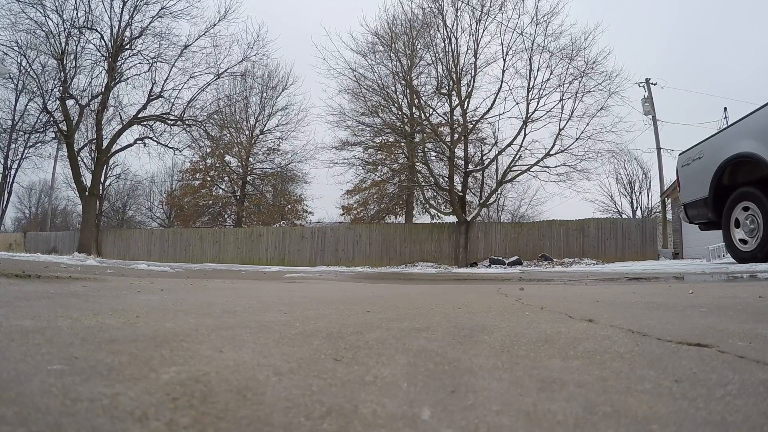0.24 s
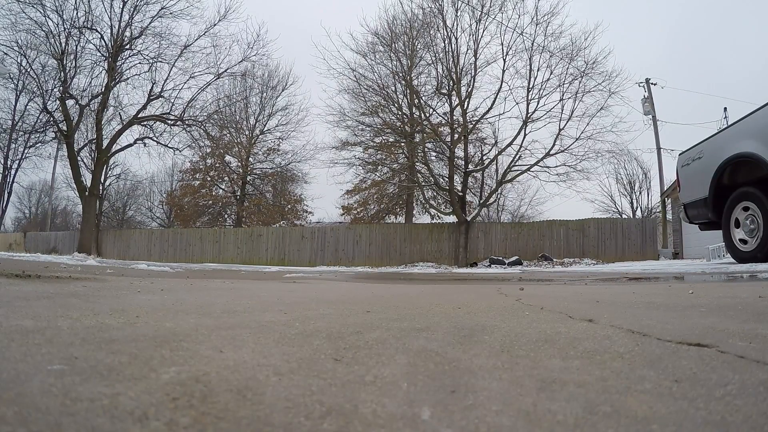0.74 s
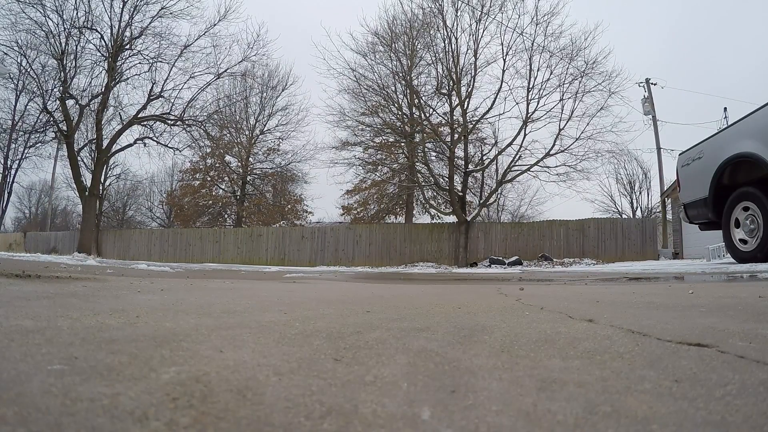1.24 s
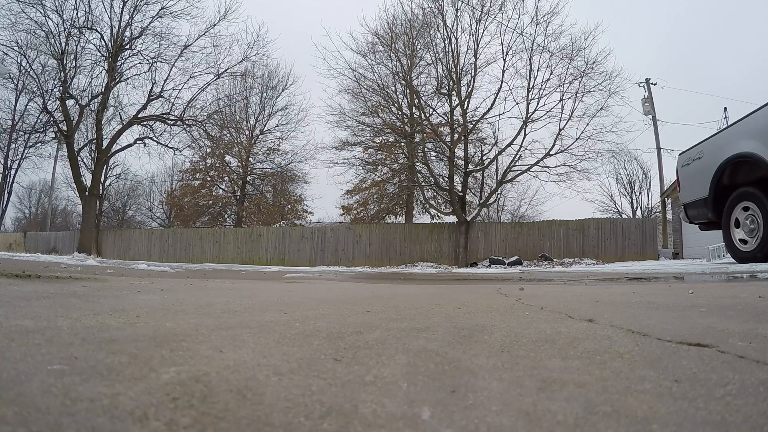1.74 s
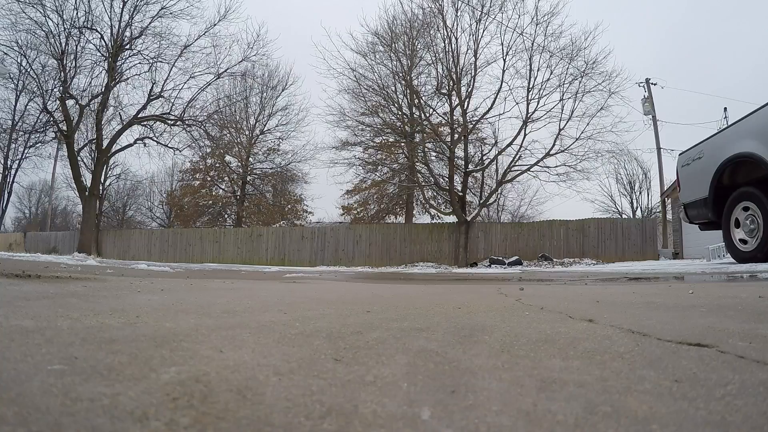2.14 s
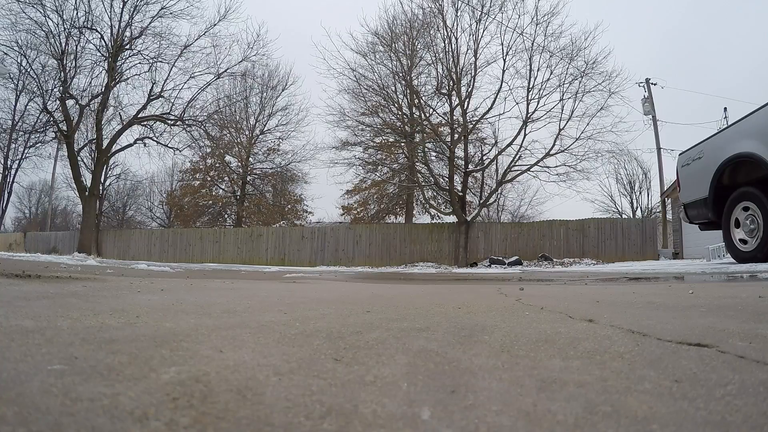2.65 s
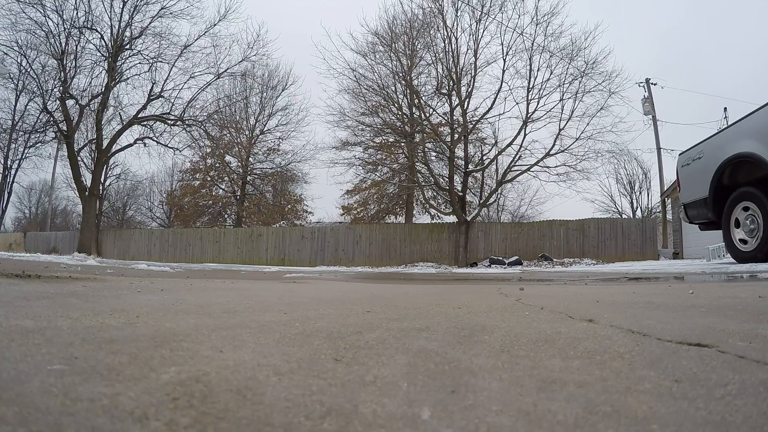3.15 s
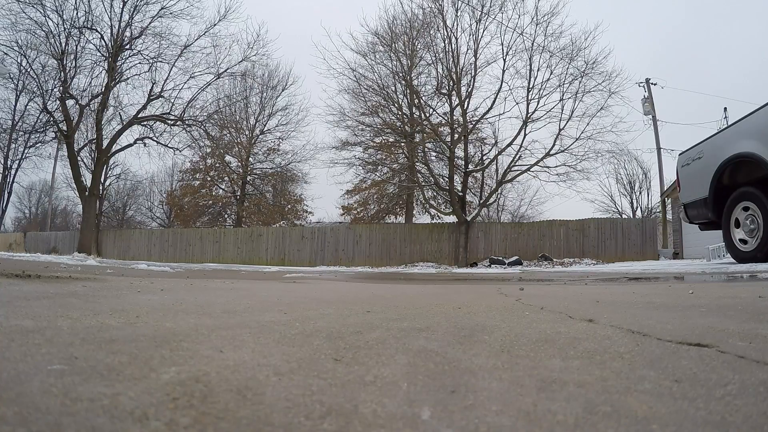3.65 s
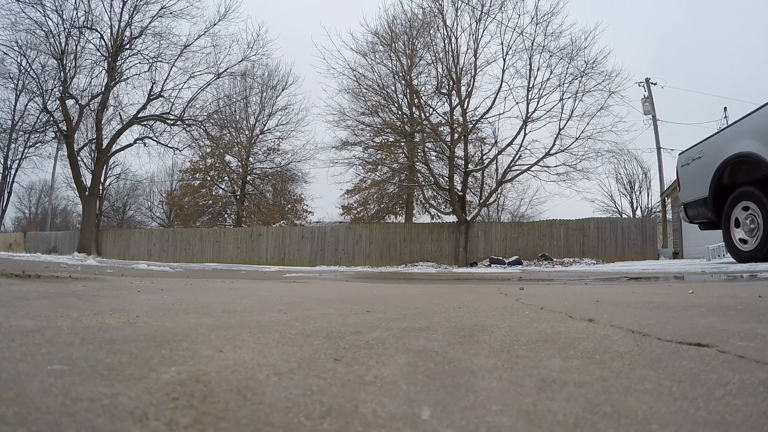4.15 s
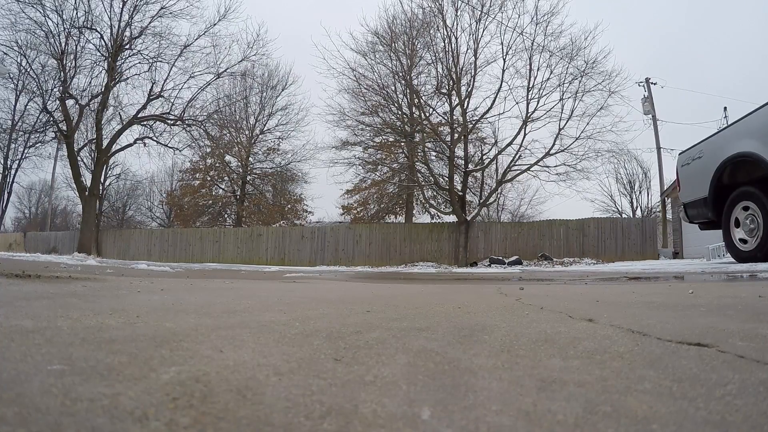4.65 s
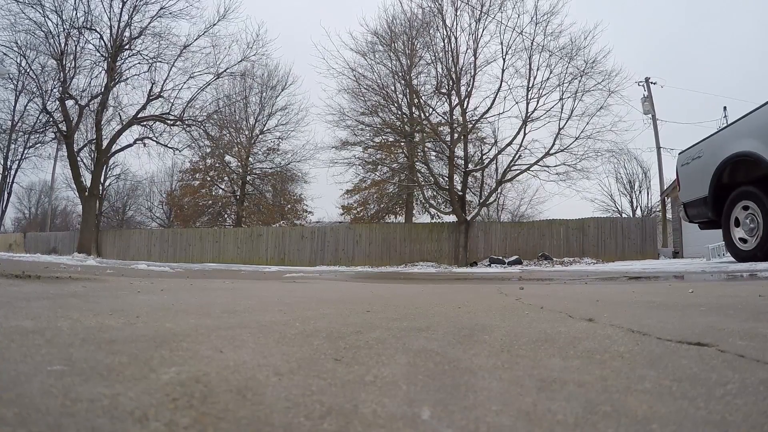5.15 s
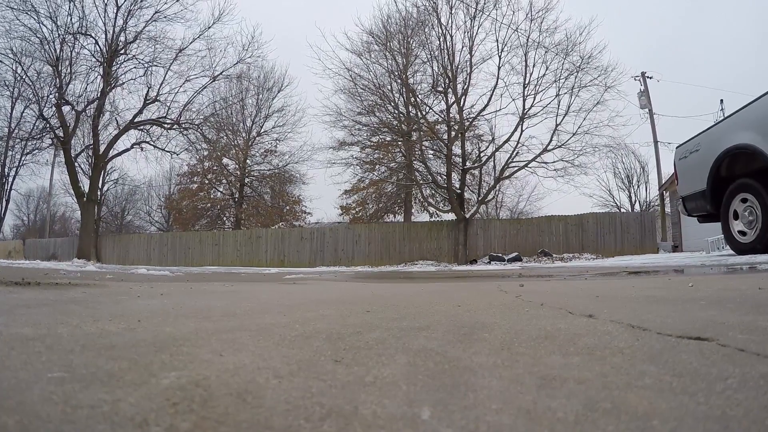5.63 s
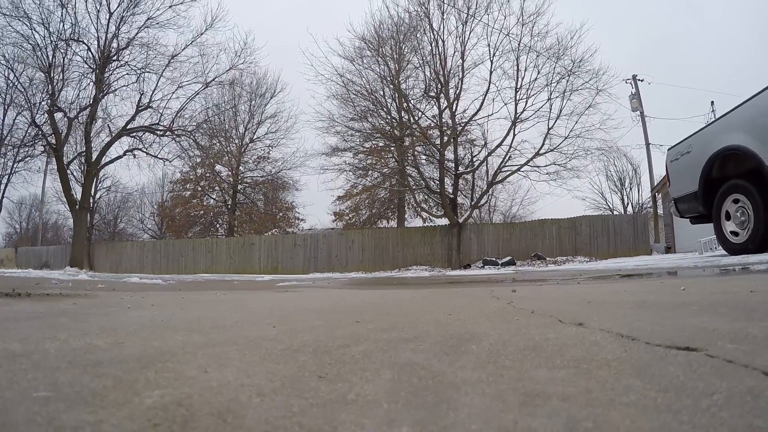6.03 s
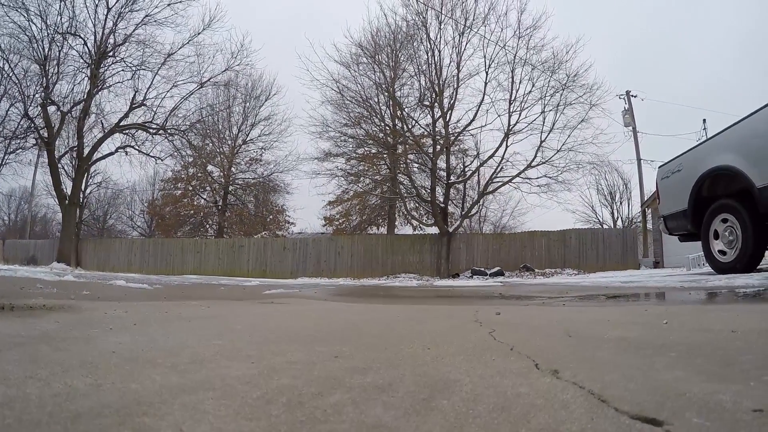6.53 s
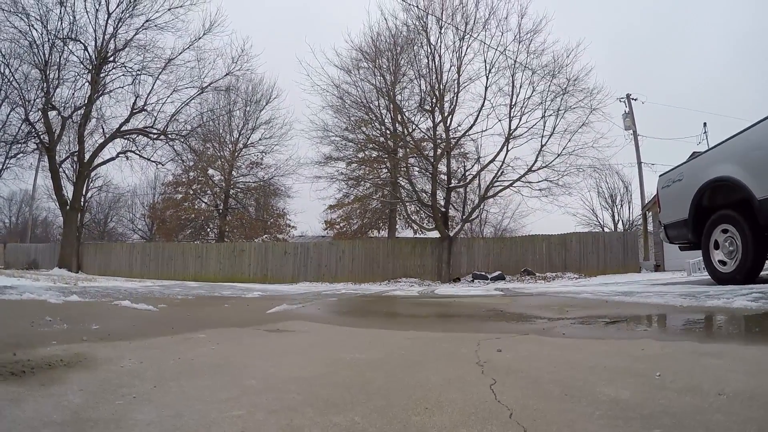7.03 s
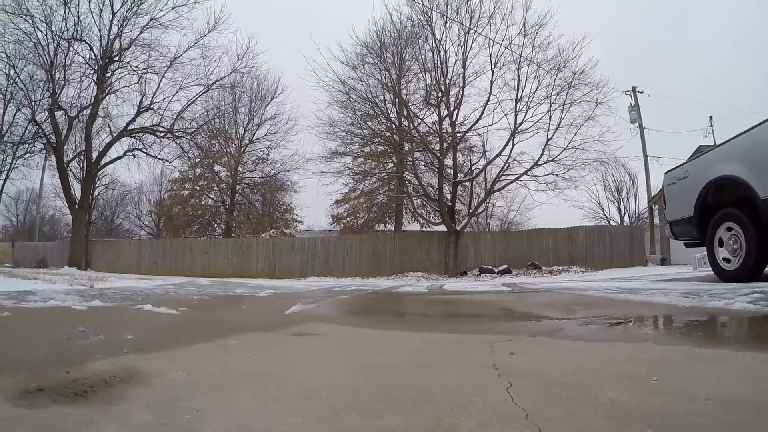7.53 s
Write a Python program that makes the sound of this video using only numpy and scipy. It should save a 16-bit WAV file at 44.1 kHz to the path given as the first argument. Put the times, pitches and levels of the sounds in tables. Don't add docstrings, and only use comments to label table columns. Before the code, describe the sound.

In a quiet yard a switch clicks, then small drone motors surge into a rough, buzzing whine that climbs as the craft lifts off.

```python
import sys
import numpy as np
from scipy import signal
from scipy.fft import rfft, irfft
from scipy.io import wavfile
from scipy.ndimage import uniform_filter1d

SR = 44100
rng = np.random.default_rng(int(sys.argv[2]) if len(sys.argv) > 2 else 0)


def inscribe(sig):
    pcm = np.round(np.clip(np.atleast_2d(sig).T, -1, 1) * 32767)
    wavfile.write(sys.argv[1], SR, pcm.astype(np.int16))


def how_loud(loudness_db):
    steps = np.asarray(loudness_db, float) / 20
    return 10 ** steps


N = 343317
START_S = 3.5845

# time_s, first_hz, second_hz, third_hz
ASKED_RATES = [(4.0, 213, 212, 213), (4.75, 217.5, 214.5, 215.5), (5.2, 222, 219, 221),
               (5.35, 231, 225, 229), (5.5, 248, 232, 238), (5.8, 266, 247, 251), (5.97, 265, 253, 258),
               (6.1, 256, 258, 260), (6.25, 254, 264, 262), (6.55, 262, 268, 277), (6.72, 265, 273, 276),
               (6.85, 272, 277, 279), (7.0, 273, 281, 290), (7.44, 280, 282, 303), (7.56, 287, 289, 310),
               (7.78, 291, 298, 309)]
# time_s, first_db, second_db, third_db
ROTOR_LEVELS = [
    (3.9, -13, -14, -32),
    (4.1, -10, -17, -25),
    (4.6, -13.5, -18, -14),
    (5.2, -11.5, -18, -19),
    (5.8, -12.5, -19, -16),
    (6.3, -19, -16, -12),
    (6.8, -22, -11, -21),
    (7.05, -13.5, -23, -12.5),
    (7.78, -13.5, -24, -12),
]
# kick_hz, gain_hz_per_s, knee_sharpness
SPIN_UP = [(12, 660, 6.5), (10, 580, 3.6), (11, 650, 6)]
# blade_rate_multiple, level_db
BLADE_HARMONICS = [(.5, -20), (1, -1.5), (1.5, -30.5), (2, -13), (2.5, -35), (3, -20), (4, -26.5),
                   (5, -30.5), (6, -34), (7, -35), (8, -34.5)]
SWITCH_RATES = [7561, 7553, 7546]
# switch_multiple, blade_rate_multiple, first_db, second_db, third_db
MOTOR_TONES = [(0, 21, -52, -46, -39.5), (0, 10.5, -46, -52, -54), (1, 0, -38, -32, -40),
               (1, 3.5, -48, -47, -54), (1, 7, -43, -34, -47), (1, -7, -54, -56, -60),
               (1, -10.5, -52, -57, -54), (1, -21, -53, -48, -56), (1, 21, -68, -68, -63),
               (2, 0, -41, -40, -41), (2, -7, -65, -60, -65)]
# time_s, whine_hz
FOURTH_WHINE = [
    (4.3, 4260),
    (5.4, 4200),
    (5.88, 3800),
    (6.14, 4750),
    (6.3, 5020),
    (6.8, 5210),
    (7.0, 5110),
    (7.35, 5080),
    (7.78, 5280),
]
# centre_hz, width_hz, level_db
FRAME_MODES = [(2550, 430, 7), (5250, 600, 7), (8400, 650, 7)]
# centre_hz, width_hz, level_db
LURCH_MODES = [(222, 120, 4), (480, 180, -13), (820, 690, -24.5), (1430, 280, -8.5), (2550, 760, -2),
               (2820, 330, -5.5), (4000, 1400, -13), (5220, 1350, -10), (6500, 2700, -13.5),
               (7460, 490, -8), (8140, 750, 3.5), (10000, 1000, -28), (13500, 1500, -26), (14700, 700, -26)]
# pitch_hz, rms_db
FRAME_HUMS = [(5495, -44.5), (5907, -49), (7348, -51), (7786, -48), (8640, -74)]
# frequency_hz, density_db
BUFFET_SPECTRUM = [(7.1, -34), (12, 5.5), (54, 8), (177, -4.5), (205, -7.5), (232, -8), (273, -9.5),
                   (605, -25), (900, -64), (1170, -105), (1980, -120)]
# frequency_hz, density_db
SWISH_SPECTRUM = [(150, -4), (300, 3.5), (600, -4.5), (1200, -1), (2000, -3), (3000, -15.5), (4500, -9)]
# frequency_hz, density_db
TIP_SPECTRUM = [(1200, -14), (2200, 1), (2900, 2), (3600, -2), (4500, 0), (6000, -1), (7000, -3), (8200, 2),
                (9300, -3), (10200, -9), (11500, -12), (13500, -11), (15000, -9), (15800, -9)]
# centre_s, peak_db, length_s
GUSTS = [
    (3.754, -21, .04),
    (3.85, -38, 0.036),
    (4.006, -27, 0.015),
    (4.49, -19.5, 0.18),
    (5.01, -19, 0.067),
    (5.15, -19.5, 0.058),
    (5.46, -24, 0.12),
    (5.655, -29, 0.1),
    (6.2, -21, 0.37),
    (6.705, -24, .04),
]
# start_s, peak_db, body_db
CLICKS = [
    (1.128, -46, -11),
    (2.1654, -49, 6),
    (2.7826, -15, -12.5),
    (2.7948, -44, 8),
    (2.8185, -42, -1),
    (2.8642, -45, -6),
]
# pitch_hz, level_db, t60_s
HOUSING_MODES = [(530, 2.5, 0.033), (764, 3.5, 0.024)]
# frequency_hz, density_db
SNAP_SPECTRUM = [(900, -10), (1500, -13), (2200, -32), (2600, 0), (3400, -1), (4700, -7), (6000, -18),
                 (13500, -13), (15700, -24)]
# frequency_hz, density_db
YARD_SPECTRUM = [(7.1, -31), (12, -1), (61, -1), (87, -10.5), (336, -25.5), (368, -23), (403, -26.5),
                 (613, -25), (779, -27), (1220, -28.5), (1460, -33), (8610, -46), (15700, -52)]
# pitch_hz, rms_db
MACHINE_HUMS = [(366.1, -72), (436.0, -74.5), (495.3, -72), (554.5, -78), (608.3, -66), (1222, -71),
                (7375, -94), (8500, -81)]


def drone():
    asked = curves(ASKED_RATES)
    smooth = [spin(hz, *law) for hz, law in zip(asked, SPIN_UP)]
    idle_hz, hover_hz = 218, 288
    load = np.clip((np.mean(asked, axis=0) - idle_hz) / (hover_hz - idle_hz), 0, 1)
    inrush = 1 - ramp(START_S, 0.26)
    wobble_hz = 0.35 + (2.6 - 0.35) * np.minimum(load / 0.35, 1)
    speeds = [hz + wobble_hz * hunting() for hz in smooth]
    phases = [turns(hz) for hz in speeds]

    rotors = 0
    for phase, hz, goal, db in zip(phases, smooth, asked, curves(ROTOR_LEVELS)):
        rotors = rotors + blades(phase, hz, thrust(hz, goal, db))

    surge_start_db, surge_full_db, rise_s, hold_s, fall_s = 9, 14.5, 0.11, 0.095, 0.07
    surge_db = surge_start_db + (surge_full_db - surge_start_db) * ramp(START_S, rise_s)
    surge_db = surge_db - surge_full_db * ramp(START_S + rise_s + hold_s, fall_s)
    tones_db = 6 * inrush - load
    octave_db = 5 + 7 * inrush - 9.5 * load
    motors = sum(motor(i, speeds[i], phases[i], surge_db, tones_db, octave_db) for i in range(3))

    lurch_db = -16.5 - 53 * ramp(START_S, 0.4) ** 2.2
    steady_db = -35 - 5 * np.minimum(2 * inrush, 1) - 2 * load
    frame = rattle(lurch_db, steady_db) + frame_hums(load)
    sound = rotors + motors + frame + downwash(phases, load) + fourth_motor()
    return ramp(START_S, 0.002) * sound


def spin(asked_hz, kick_hz, gain_hz, knee):
    climb_hz = kick_hz + gain_hz * np.maximum(np.arange(N) / SR - START_S, 0)
    return (climb_hz ** -knee + asked_hz ** -knee) ** (-1 / knee)


def hunting():
    return np.sin(turns(6.8 + 1.2 * walk(3))) + 0.35 * walk(16)


def thrust(hz, asked_hz, db):
    speed_power = 1.9
    return db + 20 * speed_power * np.log10(hz / asked_hz)


def blades(phase, hz, db):
    stack = 0
    for multiple, order_db in BLADE_HARMONICS:
        gain = how_loud(order_db + 1.25 * walk(14)) * shudder(multiple * hz)
        stack = stack + gain * np.sin(multiple * phase + 6 * rng.random())
    return np.sqrt(2) * how_loud(db) * stack


def shudder(hz):
    mount_hz, width_hz, mount_db = 128, 30, 10.5
    starting = 1 - ramp(START_S + 0.3, 0.1)
    return 1 + starting * how_loud(mount_db) / (1 + (2 * (hz - mount_hz) / width_hz) ** 2) ** 2


def motor(which, hz, phase, surge_db, tones_db, octave_db):
    switch_hz = SWITCH_RATES[which] + 2.5 * walk(5) + 4.5 * walk(60)
    switch = turns(switch_hz)
    out = 0
    for m, k, *db in MOTOR_TONES:
        tone_hz = np.abs(m * switch_hz + k * hz)
        radiates = tone_hz ** 4 / (tone_hz ** 4 + 2200. ** 4)
        passes = 1 - 0.6 / (1 + (2 * (tone_hz - 3450) / 900) ** 2)
        rings = 1 + how_loud(surge_db * (k != 0)) * resonance(tone_hz)
        group_db = octave_db if m > 1 else tones_db
        gain = how_loud(flying_db(m, k, hz) + db[which] + group_db + 2.8 * walk(14))
        out = out + gain * passes * radiates * rings * np.sin(m * switch + k * phase)
    return out


def flying_db(m, k, hz):
    if m == 0:
        from_hz, db_per_hz = (240, -0.1) if k > 20 else (245, 0.17)
    else:
        from_hz, db_per_hz = (218, 0.13) if k > 20 else (218, -0.19)
    return db_per_hz * np.maximum(hz - from_hz, 0) * (k > 0)


def fourth_motor():
    (hz,) = curves(FOURTH_WHINE)
    swell = ramp(5.85, 0.5)
    db = -35.5 - 13 * (1 - swell)
    hz = hz + swell * (75 * hunting() + 20 * walk(60))
    shaft = 1 + 0.4 * swell * (1 + 0.5 * walk(6)) * np.sin(turns(hz / 42))
    whine = shaft * how_loud(2.5 * walk(25)) * np.sin(turns(hz))
    sideband = how_loud(-7 + 5 * walk(5)) * np.sin(turns(SWITCH_RATES[1] + hz / 7))
    strand = swell * how_loud(-5 + 5 * walk(9)) * np.sin(turns(hz + 90 * hunting()))
    blade = np.sin(turns(hz / 21))
    return np.sqrt(2) * ramp(FOURTH_WHINE[0][0], 0.09) * how_loud(db) * (whine + strand + blade + sideband)


def rattle(lurch_db, steady_db):
    hz = np.arange(N // 2 + 1) * SR / N
    steps = rfft(rng.standard_normal(N) * how_loud(0.83 * walk(300)))
    modes = sum(how_loud(db) / (1 + (2 * (hz - f) / width) ** 2) ** 2 for f, width, db in LURCH_MODES)
    lurch = level(irfft(steps * modes, N), 0)
    steady = level(irfft(steps * resonance(hz), N), 0)
    return how_loud(lurch_db) * lurch + how_loud(steady_db) * steady


def resonance(hz):
    return sum(how_loud(db) / (1 + (2 * (hz - f) / width) ** 2) for f, width, db in FRAME_MODES)


def frame_hums(load):
    out = 0
    for hz, db in FRAME_HUMS:
        load_db = (1 - 14 * load) * (hz < 7000)
        out = out + how_loud(db + load_db + 1.3 * walk(5.3)) * np.sin(turns(hz + 7 * walk(27)))
    return out


def downwash(phases, load):
    t = np.arange(N) / SR
    aloft = ramp(6.68, 0.14)
    still = np.exp(-np.maximum(t - START_S - 0.15, 0) / 0.12)
    buffet_db = -22.5 - 38 * (1 - ramp(START_S, 0.25)) - 11 * aloft
    puffs = how_loud(buffet_db) + sum(how_loud(db) * np.exp(-((t - s) / length) ** 2) for s, db, length in GUSTS)
    swish_db = -26.5 - 37 * still + 1.5 * load - 9 * aloft
    tips_db = -43 - 19 * still - 0.5 * aloft
    pulse = 1 + 0.13 * (np.cos(phases[0]) + np.cos(phases[1]))
    buffet = puffs * how_loud(2.5) * noise(BUFFET_SPECTRUM, 0.96, 9.3)
    swish = how_loud(swish_db - 2) * noise(SWISH_SPECTRUM, 1.3, 15)
    tips = how_loud(tips_db + 13) * noise(TIP_SPECTRUM, 0.98, 25)
    return buffet + pulse * (swish + tips)


def clicks():
    out = np.zeros(N)
    t = np.arange(SR // 10) / SR
    hiss = noise(SNAP_SPECTRUM, 0, 5)
    thud = sum(how_loud(db) * np.sin(2 * np.pi * f * t) * 1000. ** (-t / t60) for f, db, t60 in HOUSING_MODES)
    snap = t / 0.0035 * np.exp(1 - t / 0.0025) ** 2
    scrape = how_loud(-23.5) * np.exp(-t / 0.022)
    for s, db, body_db in CLICKS:
        at = int((s - 0.0005) * SR)
        span = slice(at, at + len(t))
        out[span] += how_loud(db) * (0.27 * (snap + scrape) * hiss[span] + how_loud(body_db) * 0.32 * thud)
    return out


def yard():
    hums = 0
    for hz, db in MACHINE_HUMS:
        hums = hums + how_loud(db + 1.6 * walk(12)) * np.sin(turns(hz + hz / 200 * walk(20)))
    return how_loud(-49.5) * noise(YARD_SPECTRUM, 0.68, 4.47, count=9) + hums


def noise(shape, flicker_db, rate, count=5):
    hz, db = np.transpose(shape)
    place = np.log(np.arange(1, N // 2 + 2) * SR / N)
    colour = how_loud(np.interp(place, np.log(hz), db, -150, -150))
    spectrum = rfft(rng.standard_normal(N)) * colour
    centres = np.linspace(np.log(hz[0]), np.log(hz[-1]), count)
    out = 0
    for pick in np.eye(count):
        band = irfft(spectrum * np.interp(place, centres, pick), N)
        out = out + band * how_loud(flicker_db * walk(rate))
    return level(out, 0)


def level(x, db):
    return x * how_loud(db) / np.sqrt(np.mean(x ** 2))


def curves(rows):
    s, *columns = np.transpose(rows)
    return [np.interp(np.arange(N) / SR, s, column) for column in columns]


def walk(rate):
    hold = int(SR / rate)
    held = np.repeat(rng.standard_normal(N // hold + 1), hold)
    return 1.3 * uniform_filter1d(uniform_filter1d(held, hold), hold)[:N]


def turns(hz):
    return 2 * np.pi * (np.cumsum(hz) / SR + rng.random())


def ramp(start_s, length_s):
    return np.clip((np.arange(N) / SR - start_s) / length_s, 0, 1)


def scene():
    return (drone() + clicks() + yard())[None]


def roll_off(x):
    return signal.sosfilt(signal.butter(12, 15840, fs=SR, output="sos"), x)


def record(dry):
    soft = how_loud(-0.6) * dry / (1 + np.abs(dry) ** 5) ** 0.2
    top_cut = signal.ellip(14, 0.2, 70, 15300, fs=SR, output="sos")
    mix = signal.sosfilt(top_cut, soft)
    return roll_off(mix)


dry = scene()
out = record(dry)
inscribe(out)
```